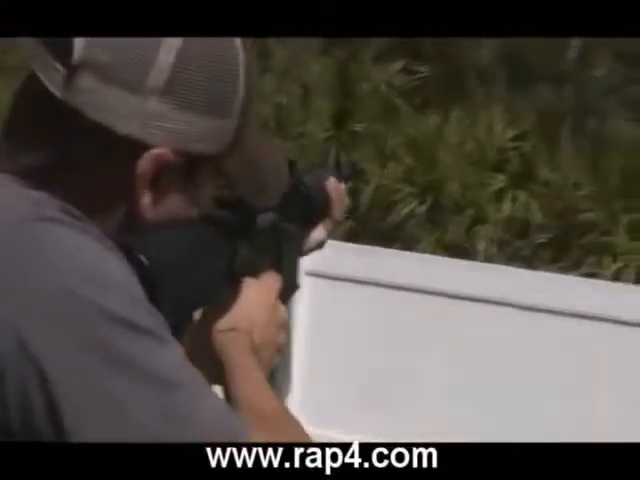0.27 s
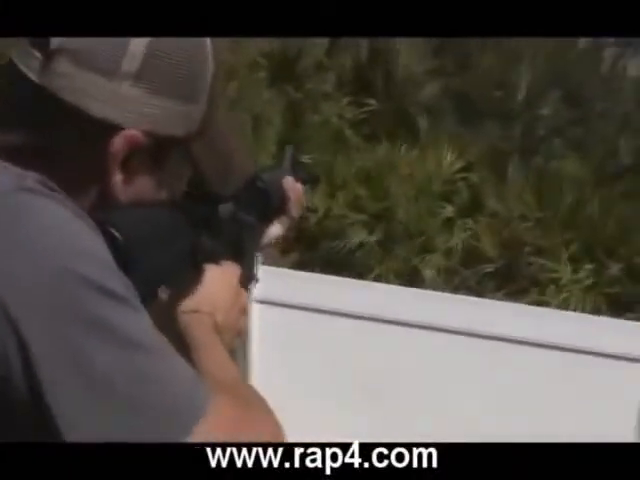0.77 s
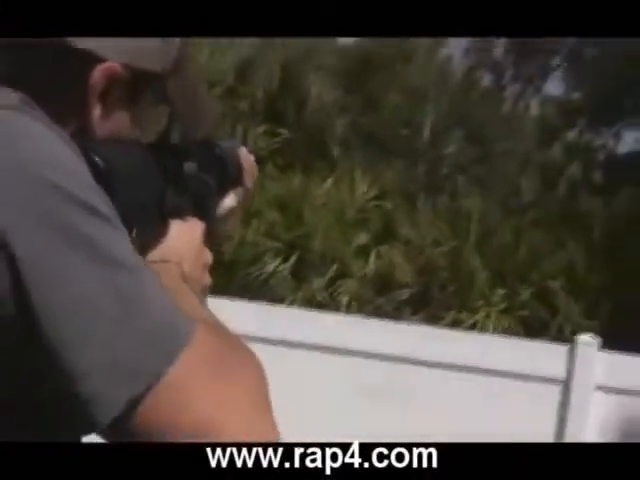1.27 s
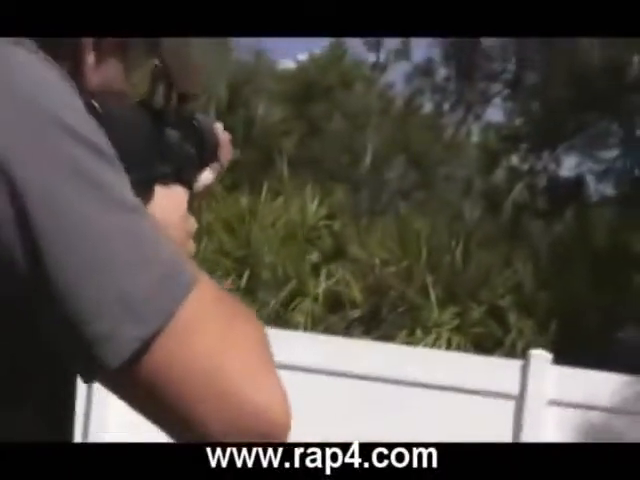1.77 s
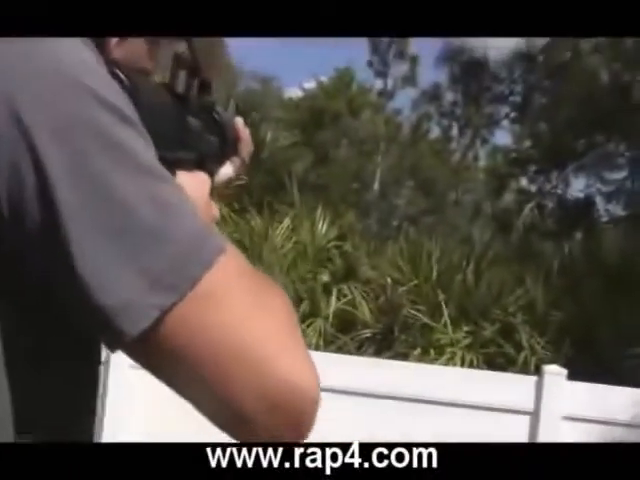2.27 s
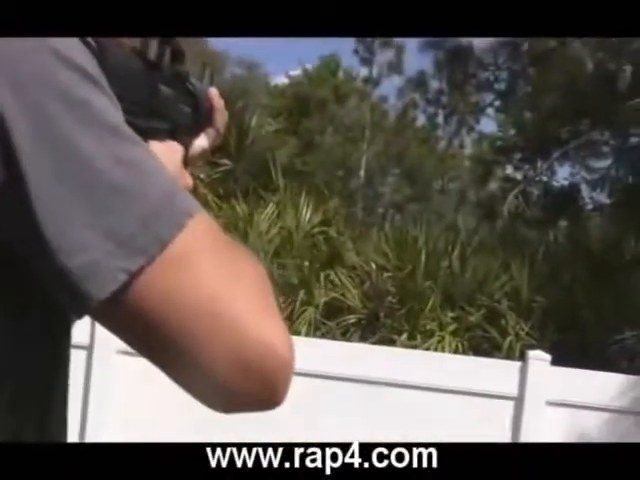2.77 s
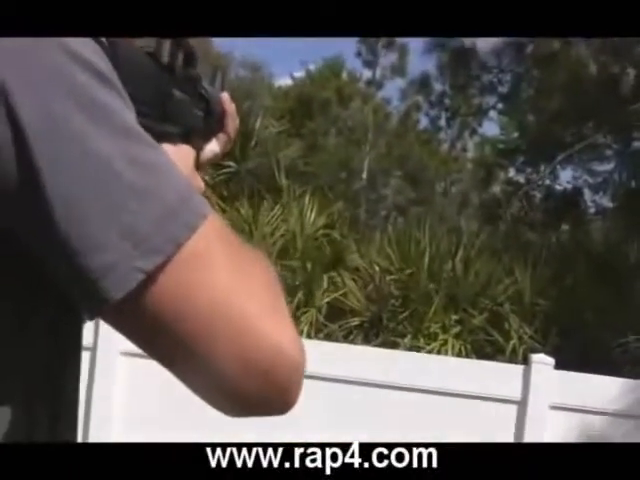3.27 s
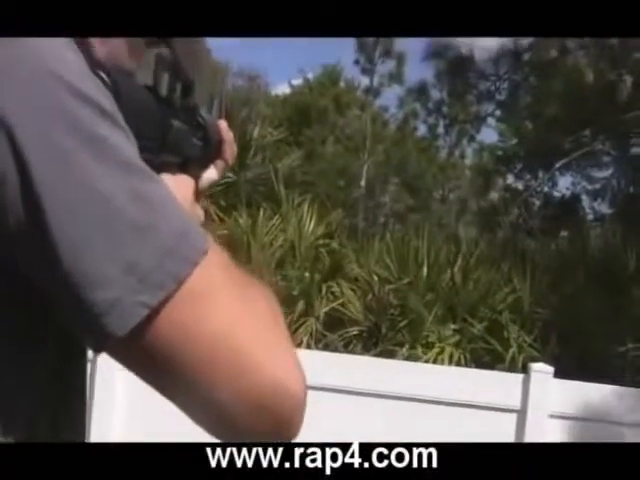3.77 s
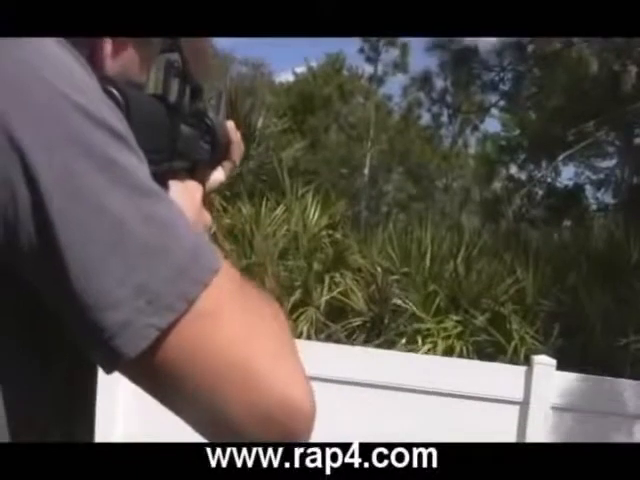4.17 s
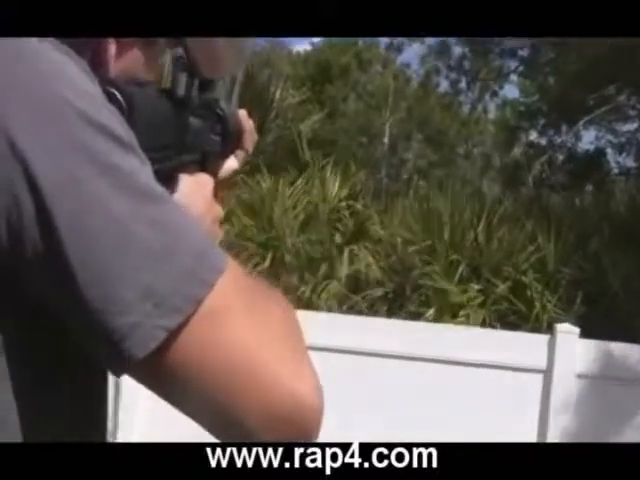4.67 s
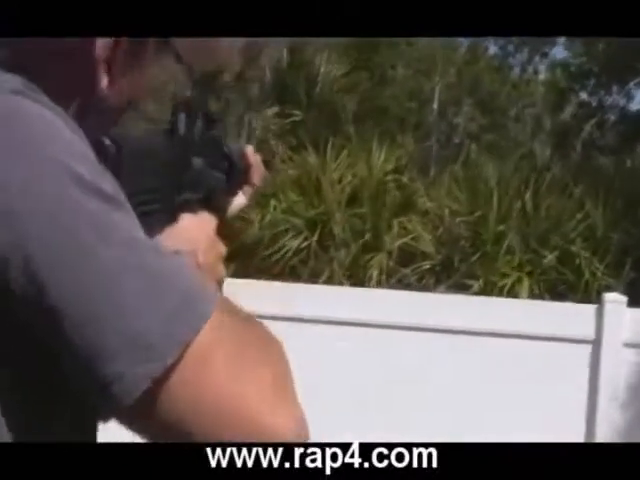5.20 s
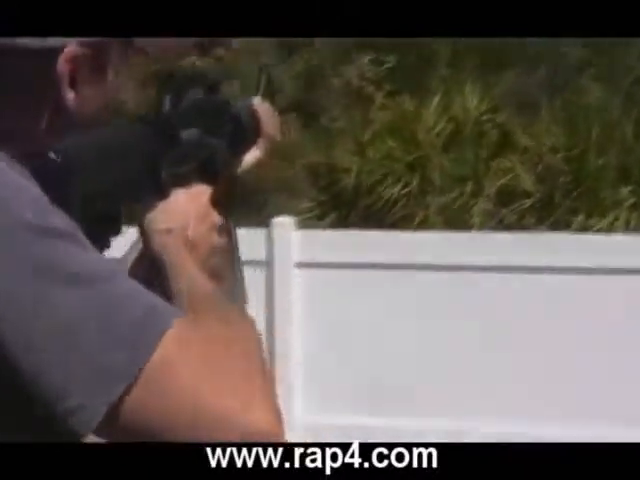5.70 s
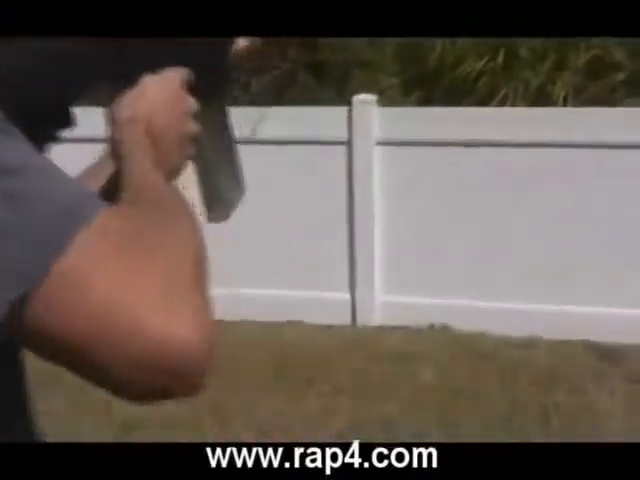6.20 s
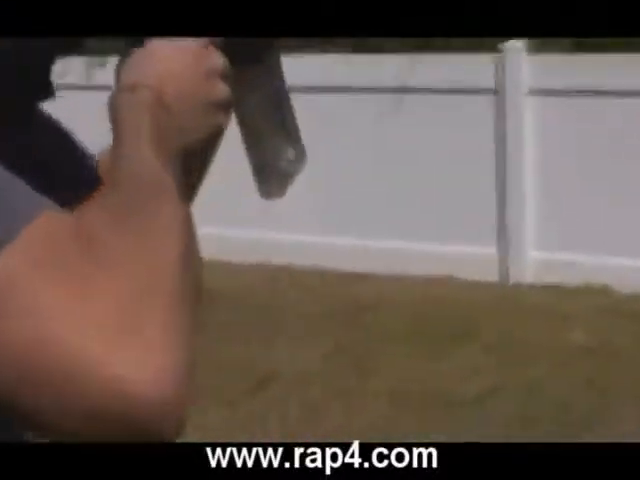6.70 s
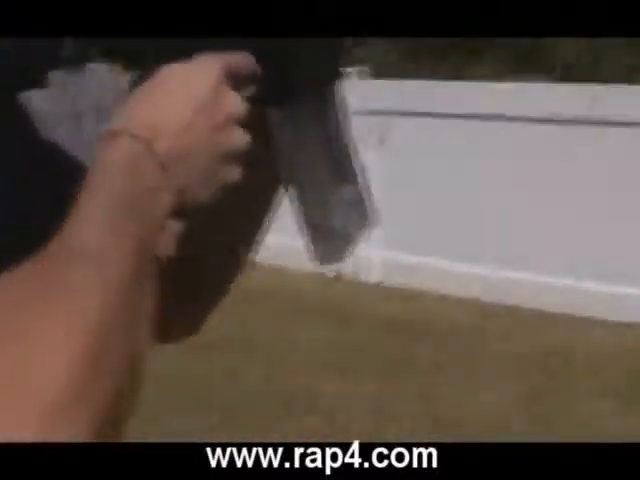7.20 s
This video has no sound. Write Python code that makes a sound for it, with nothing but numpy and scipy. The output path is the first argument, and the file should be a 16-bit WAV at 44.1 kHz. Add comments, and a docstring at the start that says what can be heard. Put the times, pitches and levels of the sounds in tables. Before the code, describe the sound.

Seven sharp pops of a compressed-air paintball gun close by in a fenced yard, with metallic clacks, short echoes and heavy buffeting wind.

```python
"""Paintball gun in a windy yard

A compressed-air gun fires seven shots close to the microphone: filtered noise for metal and gas, sines for the barrel.
Fence and walls answer each shot with a noise tail and hard returns; clicks of the trigger reset follow.
Gusts buffet both microphone ports as shaped noise, over far leaves and traffic.
Wind drives the gain control down; shots in the calm clip after the gain control."""
import sys
import numpy as np
from scipy import signal
from scipy.fft import rfft, irfft
from scipy.io import wavfile
from scipy.ndimage import uniform_filter1d

SR = 44100
rng = np.random.default_rng(int(sys.argv[2]) if len(sys.argv) > 2 else 0)


def log_audio(samples):
    """Write samples as a 16-bit WAV file to the path given in sys.argv[1]."""
    # one column per channel
    frames = np.atleast_2d(samples).T
    # limit to full scale, then quantise
    limited = np.clip(frames, -1, 1)
    pcm = np.round(limited * 32767).astype(np.int16)
    wavfile.write(sys.argv[1], SR, pcm)


def voltage_ratio(level):
    """Linear amplitude factor for a level in decibels (scalar or array-like)."""
    return 10 ** (np.asarray(level, float) / 20)


N = 328545


def evened(x):
    """Scales a sound to rms 1 over all its channels."""
    return x / np.sqrt(np.mean(x ** 2) + 1e-20)


def read(points, hz):
    """Reads a curve of (f/Hz, value) at any frequency, straight over log frequency."""
    f, value = np.transpose(points)
    return np.interp(np.log(hz + 1), np.log(f + 1), value)


def add(mix, s, sound):
    """Lays a sound into the mix at s seconds, cut at the end of the mix."""
    part = mix[..., round(s * SR):round(s * SR) + sound.shape[-1]]
    part += sound[..., :part.shape[-1]]


def coloured(x, points):
    """Filters a sound by a curve of (f/Hz, level/dB)."""
    gain = voltage_ratio(read(points, np.fft.rfftfreq(x.shape[-1], 1 / SR)))
    return irfft(rfft(x) * gain, x.shape[-1])


def burst(t, at_ms, rise_ms, fall_ms):
    """Envelope that rises and falls exponentially, top near 1."""
    since_ms = np.maximum(t * 1000 - at_ms, 0)
    rise = (1 - np.exp(-since_ms / rise_ms)) ** 2
    return rise * np.exp(-np.maximum(since_ms - 2 * rise_ms, 0) / fall_ms)


def gun():
    """All shots with their echoes, the clicks of the trigger, and one ball bursting far off."""
    # shots: t/s, hammer level/dB, gas level/dB, barrel level/dB, yard echo level/dB
    shots = [(0.8791, -10, -1.5, -4, -13.5), (1.7207, 3, -2, 1, -12.5), (2.6432, -4, -8.5, -7, -17.5),
             (4.0605, -3.5, -8.5, -4.5, -17), (4.8786, 0, -0.5, 0, -10), (6.858, -2.5, 1, -3.5, -16),
             (7.1827, 3, 2, -5, -14.5)]
    # trigger and bolt clicks after a shot: t/s, level/dB, length/ms
    resets = [(1.0562, -2.5, 4.9), (1.893, -6, 6.6), (2.773, -8, 4.8), (4.2045, -8.5, .5), (4.2251, -9, 6),
              (5.028, -3, 4.3), (6.9914, -1.5, 4.2), (7.315, -4, 6.2)]
    # a ball bursting far off in the bushes: t/s, level/dB, length/ms
    splat = (2.205, -37, 23)
    sear_db, sear_s = -15, 0.0034  # level against the hammer, lead before it
    reset_ring_db = -19  # the barrel answers each click, level against the click
    out, t = np.zeros(N), np.arange(2048) / SR
    for s, hammer_db, gas_db, barrel_db, yard_db in shots:
        add(out, s, shot(hammer_db, gas_db, barrel_db))
        add(out, s, voltage_ratio(yard_db) * yard())
        # the catch slips just before the hammer lands
        catch = burst(t, 0, 1.3, 1.5) * rattle(size=2048)
        add(out, s - sear_s, voltage_ratio(hammer_db + sear_db) * catch)
    for s, db, ms in resets + [splat]:
        add(out, s, voltage_ratio(db) * burst(t, 0, ms / 3, ms * .45) * rattle(size=2048))
    for s, db, ms in resets:
        add(out, s + ms / 2000, voltage_ratio(db + reset_ring_db) * ring(size=2048))
    return out


def shot(hammer_db, gas_db, barrel_db):
    """Hammer clack, then the blast: puffs of gas noise and the bolt's stop over the ringing barrel."""
    # puffs of escaping gas: t/ms after the hammer, level/dB against the gas, rise/ms, fall/ms
    puffs = [(2, -8, 1.1, 26), (10.26, -0.5, 0.43, 1.7), (12.07, 5.5, 0.96, 0.93), (17.5, 2.5, 0.62, 2.4),
             (21.8, -19, 1.7, 3.5)]
    # pressure steps that strike the barrel: t/ms after the hammer, strength (minus = suction)
    pushes = [(10.3, -0.76), (13.6, 1.3), (18.6, -0.22)]
    # colour of the gas: f/Hz, level/dB per Hz
    gas_colour = [(250, -29.5), (600, -3.5), (1500, -7), (2300, -4.5), (3100, -12.5), (4200, -4),
                  (5300, -17), (6300, -8.5), (12000, -21.5), (14000, -49)]
    slam_ms = 13.5  # after the hammer
    kick_db, kick_hz, kick_ms = -25.5, 35, 12  # level against the barrel, pitch, fall
    t = np.arange(4096) / SR
    clack = burst(t + .001, 0, 1.2, 1.5)  # starts 1 ms into its rise
    hammer = voltage_ratio(hammer_db) * clack * rattle(size=4096)
    # the bolt hits its stop
    slam = voltage_ratio(gas_db + 6.5) * burst(t, slam_ms, 0.51, 0.84) * rattle(size=4096)
    jet = evened(coloured(rng.standard_normal(4096), gas_colour))
    pressure = sum(voltage_ratio(db) * burst(t, ms, rise, fall) for ms, db, rise, fall in puffs)
    gas = voltage_ratio(gas_db) * jet * pressure
    barrel = np.zeros(4096)
    for ms, strength in pushes:
        add(barrel, ms / 1000, strength * voltage_ratio(barrel_db) * ring(size=4096))
    # the blast pushes the microphone
    push = burst(t, pushes[0][0], 2.5, kick_ms)
    kick = voltage_ratio(barrel_db + kick_db) * push * np.sin(2 * np.pi * kick_hz * t)
    return hammer + slam + gas + barrel + kick


def ring(size):
    """The modes of the barrel after one blow, as dying sines."""
    # barrel modes: f/Hz, level/dB, time to fall 60 dB/s
    modes = [(399, 3.5, 0.019), (756, -1, 0.02), (1870, -5, 0.025)]
    t = np.arange(size) / SR
    return sum(voltage_ratio(db - 60 * t / t60) * np.sin(2 * np.pi * hz * t) for hz, db, t60 in modes)


def rattle(size):
    """Noise through the resonances of the metal body, thinned below 600 Hz."""
    # body resonances: f/Hz, width/Hz, level/dB
    resonances = [(3980, 350, 19), (4300, 500, 15), (2380, 2100, 12), (6530, 650, 10.5), (8900, 1000, -8.5)]
    hz = np.fft.rfftfreq(size, 1 / SR)
    body = sum(voltage_ratio(db) / (1 + 2j * (hz - f) / width) for f, width, db in resonances)
    body = body + voltage_ratio(-31.5)  # a little unresonant noise
    thin = hz ** 2 / (hz ** 2 + 600 ** 2)
    return evened(irfft(rfft(rng.standard_normal(size)) * body * thin, size))


def yard():
    """A dense tail that gathers and dies band by band, and a few hard returns of the muzzle wave."""
    # returns from fence and walls: t/ms after the hammer, level/dB
    echoes = [(40.5, 17), (47, 11), (68, 11), (79, 15), (130, 12)]
    # colour of the tail: f/Hz, level/dB per Hz
    yard_colour = [(88, -44), (150, -12), (476, -12.5), (604, -30), (781, -8.5), (973, -22), (1050, -18),
                   (2220, -12.5), (3450, -16), (9630, -23), (12000, -27.5), (15600, -57), (22000, -120)]
    # dying of the tail: f/Hz, time to fall 60 dB/s
    yard_t60 = [(300, 0.58), (800, 0.96), (2500, 0.87), (6000, 0.8), (11000, 0.69)]
    # gain on the tail before the first fence answers: f/Hz, level/dB
    early = [(300, 3.5), (900, -17), (2500, -2), (5000, -3.5)]
    # hollow ring of the fence boards: f/Hz, width/Hz of each of two resonators, level/dB, fall/ms
    panel_hz, panel_width, panel_db, panel_fall_ms = (770, 430, 0, 30)
    first_ms = echoes[0][0]
    noise = evened(coloured(rng.standard_normal(SR), yard_colour))
    hz, frame_s, z = signal.stft(noise, SR, nperseg=128, noverlap=96)
    since_ms = np.maximum(frame_s * 1000 - 14, 0)  # the blast leaves the muzzle here
    # bushes and posts return uneven lumps
    lumps = uniform_filter1d(rng.standard_normal(z.shape), 3, 0)
    lumps = evened(uniform_filter1d(lumps, 9, 1))
    z *= (1 - np.exp(-since_ms / 5)) * voltage_ratio(2.24 * lumps)
    z[:, frame_s * 1000 < first_ms] *= voltage_ratio(read(early, hz))[:, None]
    decay = voltage_ratio(-60 * frame_s / read(yard_t60, hz)[:, None])
    tail = signal.istft(z * decay, SR, nperseg=128, noverlap=96)[1]
    boards = 1 / (1 + 2j * (np.fft.rfftfreq(SR, 1 / SR) - panel_hz) / panel_width) ** 2
    hollow = evened(irfft(rfft(rng.standard_normal(SR)) * boards, SR))
    add(tail, 0, voltage_ratio(panel_db) * hollow * burst(np.arange(SR) / SR, first_ms, 9.7, panel_fall_ms))
    # muzzle wave: a push, then a suction
    u = np.arange(256) / (0.00018 * SR)
    wave = (1 - u) * np.exp(-u) * (1 - np.exp(-3 * u))
    fade = np.exp(-np.arange(90) / 40)
    for (ms, db), spread in zip(echoes, rng.standard_normal((len(echoes), 90))):
        scattered = np.convolve(wave, np.r_[1, .25 * spread * fade])  # rough boards smear it
        add(tail, ms / 1000, voltage_ratio(db) * scattered)
    return tail


def wind():
    """Rumble nearly alike at both ports; roar, crackle and sizzle less alike; gusts, thumps and ticks."""
    # wind at the ports: t/s, rumble level/dB, roar level/dB
    course = [(0, -42, -80), (.35, -42.5, -88), (0.591, -33, -80), (.62, -23, -27.5), (.70, -16.5, -12.5),
              (.88, -31, -12.5), (.95, -18.5, -15), (1.15, -15, -21.5), (1.30, -20.5, -29.5),
              (1.36, -23.5, -41), (1.50, -26.5, -38), (1.70, -54, -88), (2.0, -38, -84), (2.25, -33, -70),
              (2.45, -39.5, -83), (2.6, -52, -91), (3.3, -61, -89), (4.58, -48.5, -64), (4.75, -25.5, -31),
              (4.82, -19, -15), (5.0, -14.5, -17), (5.18, -9.5, -12), (5.40, -23, -8), (5.47, -8.5, -22),
              (5.599, -15.5, -5), (5.95, -10, -8), (6.15, -14.5, -10), (6.339, -16, -4), (6.39, -19, -17),
              (6.622, -14.5, -15), (6.85, -20, -11.5), (7.031, -19.5, -30), (7.112, -17, -6.5),
              (7.45, -12.5, -11.5)]
    # colours of rumble, roar and the bright edge of hard wind: f/Hz, level/dB per Hz
    rumble_colour = [(20, -39), (40, 1.5), (95, 13), (160, 13), (260, 5), (500, -51.5)]
    roar_colour = [(35, -52), (60, -22), (154, 3.5), (349, 3.5), (388, 1), (655, -10.5), (1420, -41.5),
                   (2510, -35.5), (3580, -55), (6000, -53), (11700, -83), (19800, -120)]
    sizzle_colour = [(400, -25), (900, 3.5), (1600, -5), (2600, -11.5), (4500, -27.5), (7000, -42),
                     (12000, -70)]
    # left-right likeness: f/Hz, correlation (minus = opposed)
    rumble_same = [(50, 0.96), (250, 1)]
    roar_same = [(100, .5), (270, 0.91), (600, 0.051), (1200, -0.053), (3000, -0.83)]
    # gusts that hit the ports with a slap and die away: t/s, roar level/dB, fall/ms, slap level/dB
    gusts = [(.636, -15.5, 20, -6.5), (.655, -9.5, 25, -21), (.766, -15, 16, -4), (.826, -12.5, 13, -17),
             (1.058, -10, 75, -30), (1.105, -21, 52, -32), (1.16, -12.5, 20, -27),
             (1.195, -20.5, 18, -25.5), (1.365, -20, 20, -35), (1.385, -18, 19, -35), (1.411, -17, 11, -22),
             (1.453, -18, 6.7, -35), (4.751, -34, 22, -18.5), (4.851, -12.5, 33, -11.5),
             (5.06, -23, 36, -30), (5.159, -18, 12, -10.5), (5.218, -0.5, 66, 9), (5.255, -6, 30, 11.5),
             (5.294, -2.5, 25, 8), (5.34, 4.5, 19, 0), (5.427, 2, 21.5, -20.5), (5.485, 5, 93, -0.5),
             (5.586, -2, 12, -1), (5.72, -3, 20, -10), (5.76, -24, 13, -10), (5.83, -19, 17, -13),
             (5.90, -21, 14, -8), (5.988, -6, 20, -5), (6.057, 1, 20.6, -14), (6.168, -11.5, 16, -29),
             (6.10, -7.5, 20, -5), (6.26, -9, 9.1, -6.5), (6.31, -18, 25, -13), (6.44, -25, 13, -28),
             (6.579, -45, 18, -14), (6.703, -5, 6.7, -17), (6.738, -11, 9.9, -13), (6.759, -17.5, 6.7, -15),
             (7.083, -18.5, 33, -28)]
    # low thumps in the light breeze: t/s, level/dB, length/ms
    thumps = [(.075, -40, 34), (.165, -19, 12), (.205, -22, 32), (1.60, -30, 73), (1.655, -29.5, 20),
              (1.935, -24.5, 28), (2.05, -29.5, 34), (2.125, -31.5, 22), (2.216, -24.5, 30),
              (2.28, -24.5, 18), (2.335, -21, 13), (2.43, -33, 20), (3.086, -31, 13)]
    # thin ticks in the wind: t/s, level/dB
    ticks = [(.666, -7), (1.222, -25), (1.258, -23), (5.31, -5), (5.326, -4), (5.627, -15), (5.65, -12),
             (6.008, -11), (6.408, -25), (6.437, -27), (6.579, -20), (6.703, -18), (6.742, -20),
             (6.759, -23), (6.818, -22)]
    lump_db, lump_s = 2.2, .012  # quick lumps in the roar
    lean_db, wander_db, wander_s = -3, 2.5, .06  # left minus right: leans right and wanders
    sizzle_db, sizzle_growth = -18, 1.85  # the sizzle grows faster than the roar
    s, *columns = np.transpose(course)
    rumble_level, roar_level = (voltage_ratio(np.interp(np.arange(N) / SR, s, c)) for c in columns)
    roar_level = roar_level * voltage_ratio(lump_db * wander(lump_s))
    t, slaps = np.arange(SR // 3) / SR, np.zeros((2, N))
    for at, db in ticks:
        hiss = evened(coloured(rng.standard_normal(1024), sizzle_colour))
        add(slaps, at, voltage_ratio(db) * burst(t[:1024], 0, 0.65, 2.3) * hiss)
    for at, db, ms in thumps:
        add(rumble_level, at, voltage_ratio(db) * burst(t, 0, ms * 0.1, ms * 0.5))
    for at, db, ms, slap_db in gusts:
        gust = voltage_ratio(db) * burst(t, 0, 1.5, ms)
        add(roar_level, at, gust)
        add(rumble_level, at, voltage_ratio(-22) * gust)
        add(slaps, at, voltage_ratio(slap_db) * eddy())
    steady = voltage_ratio(1.5) * field(roar_colour, roar_same, patchy_db=1.2, flicker_db=0.78)
    rough = voltage_ratio(-2.5) * roar_level ** .35 * crackle()  # strong gusts crackle more
    roar = roar_level * (steady + rough)
    sizzle = field(sizzle_colour, roar_same, patchy_db=1.6, flicker_db=1.7)
    roar += voltage_ratio(sizzle_db) * roar_level ** sizzle_growth * sizzle
    pan_db = lean_db + wander_db * wander(wander_s)
    rumble = field(rumble_colour, rumble_same, patchy_db=.8, flicker_db=2.5)
    return rumble_level * rumble + (roar + slaps) * voltage_ratio(np.array([[.5], [-.5]]) * pan_db)


def crackle():
    """About 600 small slaps a second at random times and sizes, drawn from twelve eddies."""
    size = voltage_ratio(3 * np.minimum(rng.exponential(1, N), 2.5)) * (rng.random(N) < 600 / SR)
    kind = rng.integers(0, 12, N)
    slaps = (signal.oaconvolve((size * (kind == k))[None], eddy(), axes=1)[:, :N] for k in range(12))
    return evened(sum(slaps))


def eddy():
    """One slap of air: a short noise burst, unlike at the two ports."""
    # colour of a slap: f/Hz, level/dB per Hz
    slap_colour = [(60, -15), (200, -6), (500, 10.5), (1500, -9.5), (3500, -24), (5500, -33.5), (8000, -51),
                   (12000, -78)]
    noise = evened(coloured(rng.standard_normal((2, 1024)), slap_colour))
    return burst(np.arange(1024) / SR, 0, 0.47, 3.36) * noise


def wander(span_s):
    """Random drift of rms 1, quick or slow by its span: noise averaged twice."""
    size = round(span_s * SR)
    return evened(uniform_filter1d(uniform_filter1d(rng.standard_normal(N), size), size))


def field(points, same, patchy_db, flicker_db):
    """Two channels of noise with patches common to both and a flicker of each channel across all bands."""
    frames, hz = N // 64 + 5, np.fft.rfftfreq(256, 1 / SR)
    patches = uniform_filter1d(rng.standard_normal((frames, 129)), 15, 0)
    patches = evened(uniform_filter1d(patches, 4, 1))
    flicker = evened(uniform_filter1d(rng.standard_normal((2, 1, frames)), 8))
    noise = coloured(rng.standard_normal((2, N)), points)
    _, _, (za, zb) = signal.stft(noise, nperseg=256, noverlap=192)
    # the second channel mixes the first with fresh noise, band by band
    c = np.clip(read(same, hz), -1, 1)[:, None]
    z = np.array([za, c * za + np.sqrt(1 - c ** 2) * zb])
    z *= voltage_ratio((patchy_db * patches.T + flicker_db * flicker)[..., :z.shape[-1]])
    return evened(signal.istft(z, nperseg=256, noverlap=192)[1][:, :N])


def far_air():
    """Far leaves and traffic: one channel of steady coloured noise."""
    # colour of the far air: f/Hz, level/dB per Hz
    air_colour = [(24, -54.5), (40, -2), (90, -4.5), (276, -2.5), (335, 0), (377, -2.5), (456, 2),
                  (490, 0.5), (956, -3.5), (1210, -5), (3470, -13), (4510, -13), (12000, -24), (15600, -63),
                  (22000, -120)]
    return voltage_ratio(-39) * field(air_colour, [(100, 0)], patchy_db=.7, flicker_db=.2)[0]


def scene():
    """Gun and far air lie in the middle with a trace of width; the wind is wide."""
    # width of the middle sounds: f/Hz, side minus mid level/dB
    side_colour = [(200, -52), (1100, -34.5), (2600, -22), (3600, -10.5)]
    middle = gun() + far_air()
    smeared = signal.fftconvolve(middle, rng.standard_normal(400) / 20)[:N]
    width = coloured(smeared, side_colour)
    return middle + np.array([[1], [-1]]) * width + wind()


def gain_control(dry):
    """Lasting bass turns the level down; the hold on it then lets go slowly."""
    bass = signal.sosfilt(signal.butter(2, 500, fs=SR, output="sos"), dry)
    power_db = 10 * np.log10(abs(uniform_filter1d((bass ** 2).mean(0), 441)) + 1e-9)
    # averaged over 3500 samples and moved 1500 later
    lasting_db = np.r_[np.full(1500, -60.), uniform_filter1d(power_db, 3500)][:N]
    fall = np.arange(N) * 12.46 / SR  # the held bass level sinks by 12.46 dB a second
    held_db = np.maximum.accumulate(lasting_db + fall) - fall
    over_db = np.maximum(held_db + 24.0, 0)  # above a threshold of -24 dB
    return dry / voltage_ratio(0.8 * over_db)


def top_cut(x):
    """Nothing passes above the cut-off."""
    return signal.sosfilt(signal.butter(12, 12190, fs=SR, output="sos"), x)


def record(dry):
    """Two ports into a gain control; nearly mono treble, clipping, then a 12.3 kHz low-pass."""
    left, right = gain_control(dry)
    side = signal.oaconvolve((left - right) / 2, signal.firwin(255, 4050, fs=SR), "same")
    side += voltage_ratio(-34.5) * (left - right)  # a trace of width stays above 4050 Hz
    clipped = np.clip((left + right) / 2 + np.array([[1], [-1]]) * side, -.98, .98)
    edge = signal.firwin(255, 12300, window=("kaiser", 5), fs=SR)
    mix = signal.oaconvolve(clipped, edge[None], "same")
    return top_cut(mix)


dry = scene()
out = record(dry)
log_audio(out)
```